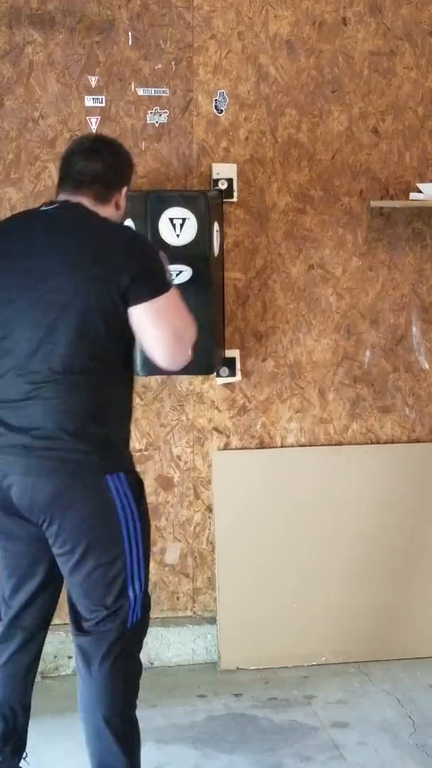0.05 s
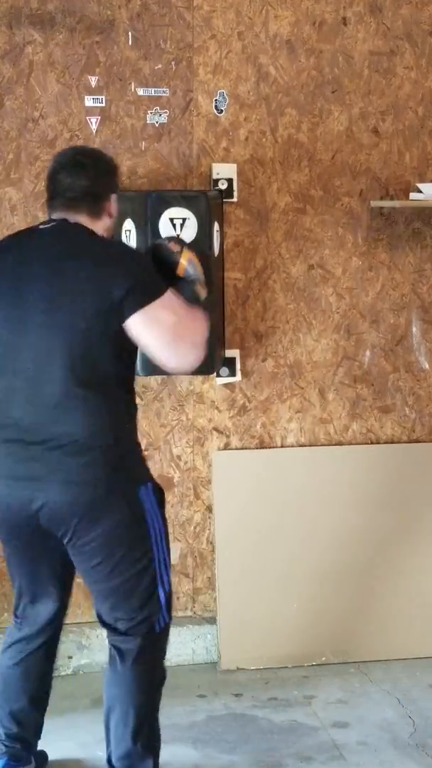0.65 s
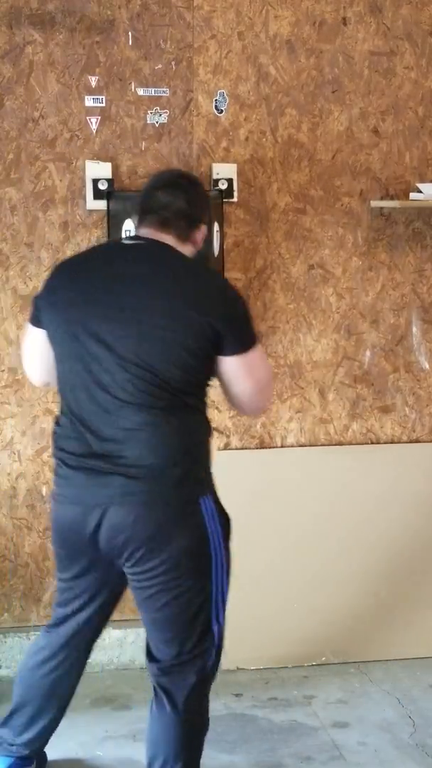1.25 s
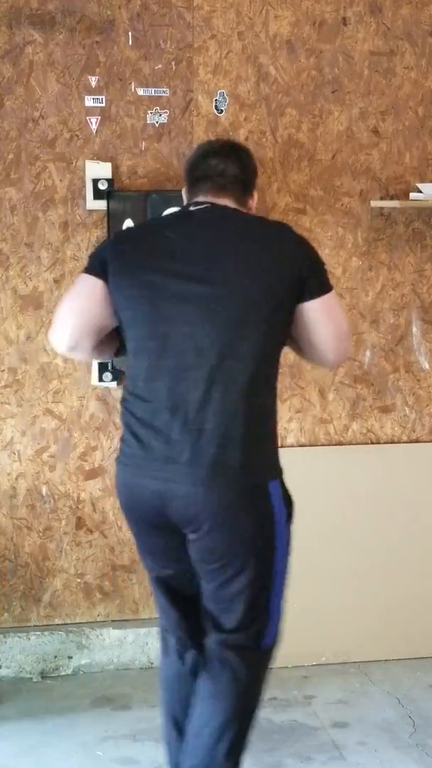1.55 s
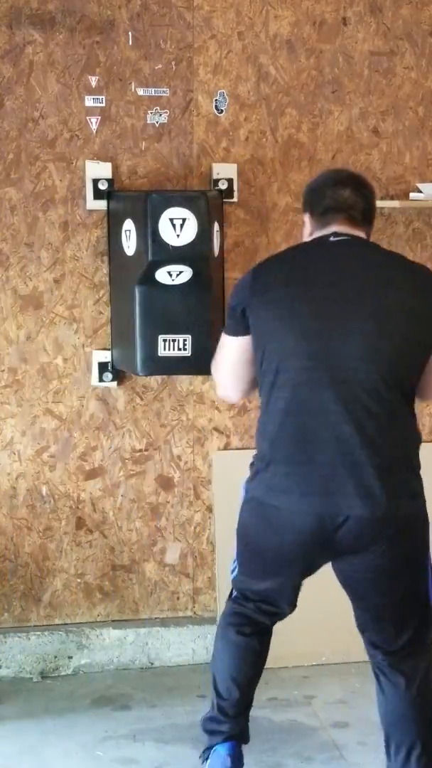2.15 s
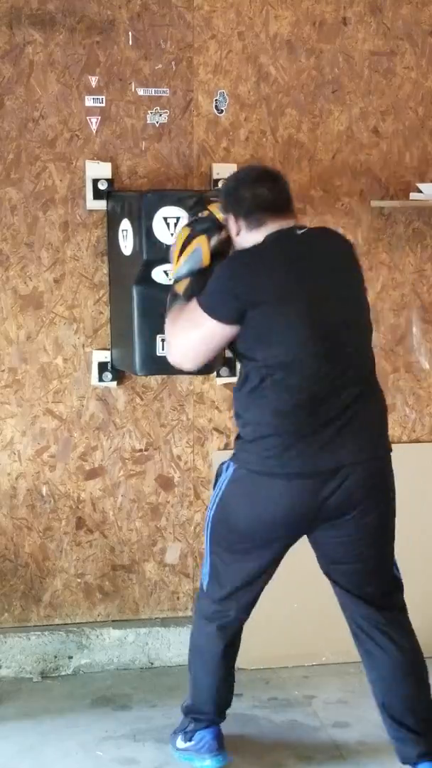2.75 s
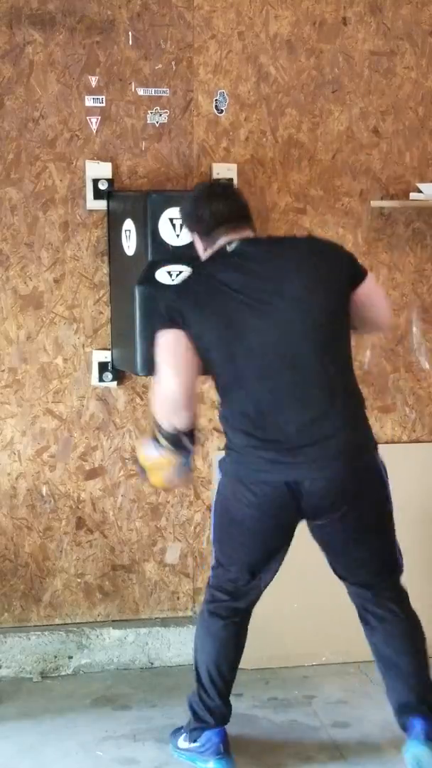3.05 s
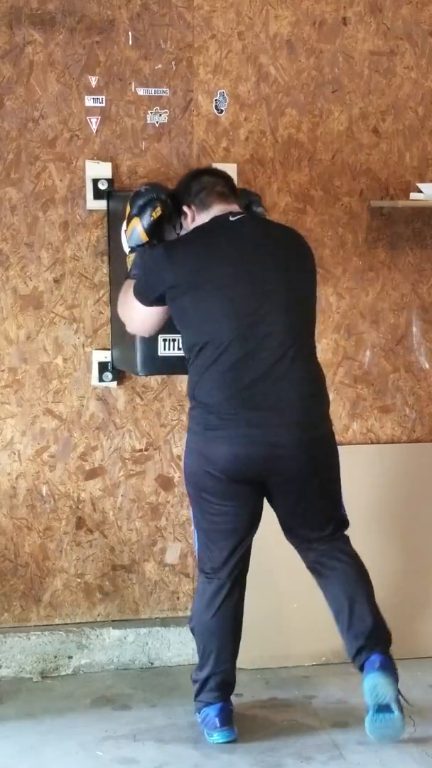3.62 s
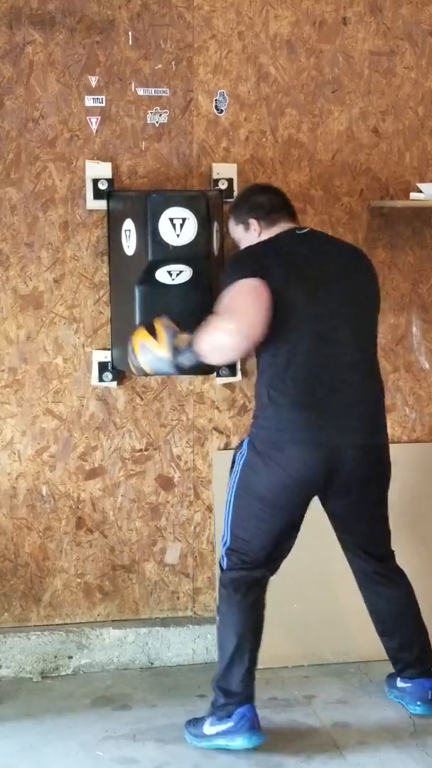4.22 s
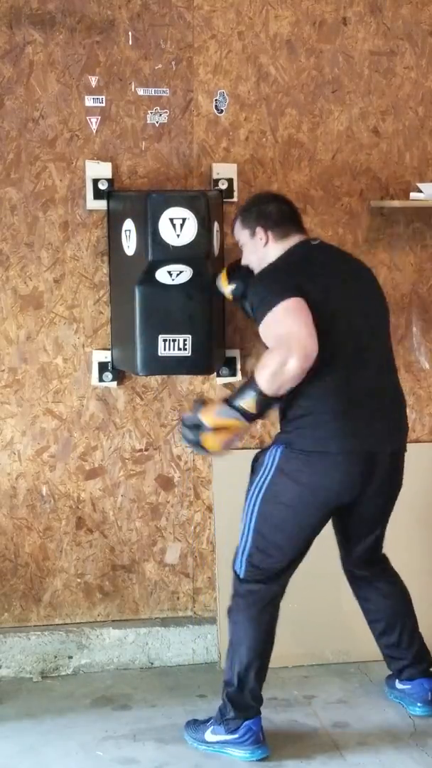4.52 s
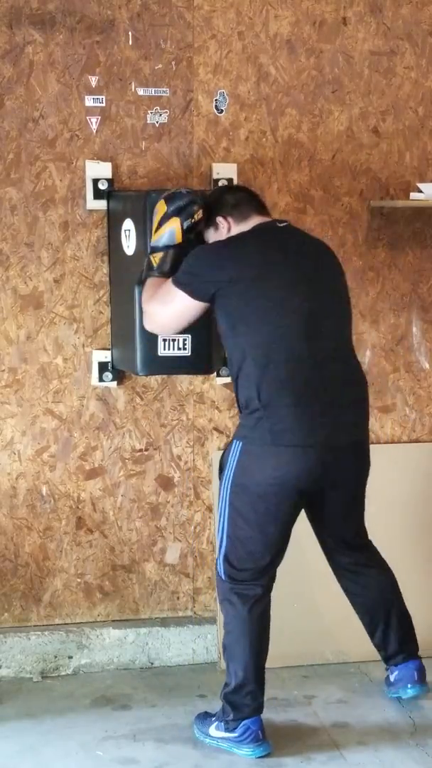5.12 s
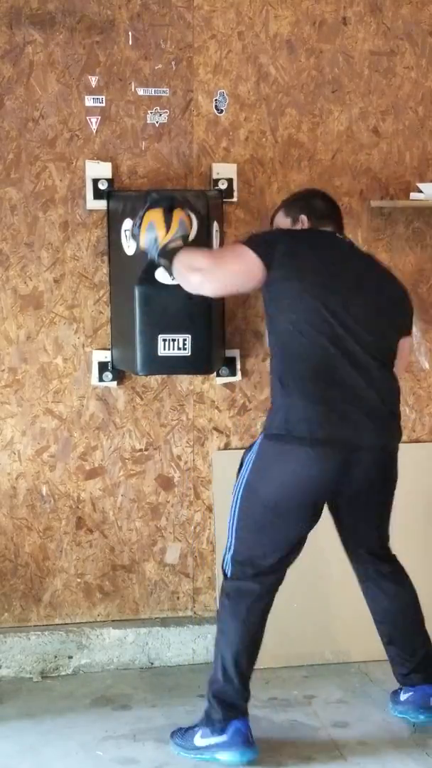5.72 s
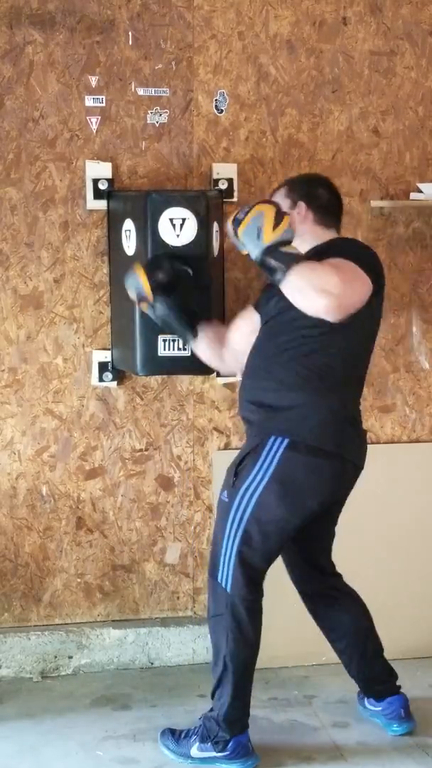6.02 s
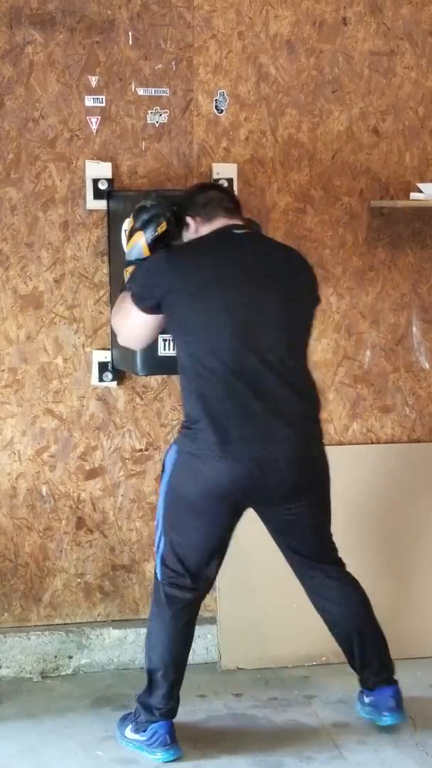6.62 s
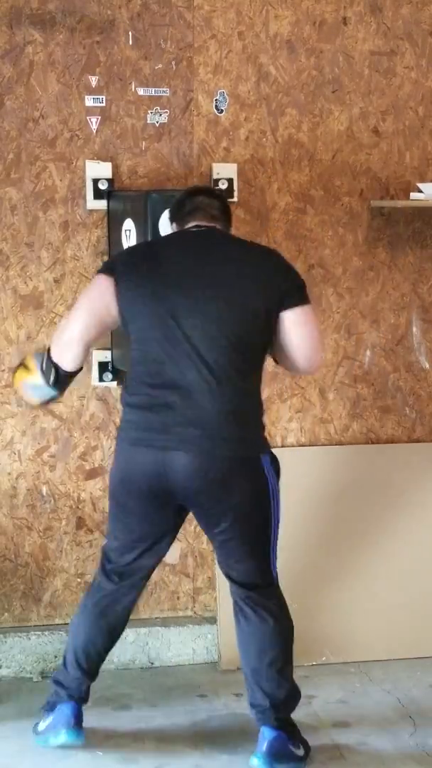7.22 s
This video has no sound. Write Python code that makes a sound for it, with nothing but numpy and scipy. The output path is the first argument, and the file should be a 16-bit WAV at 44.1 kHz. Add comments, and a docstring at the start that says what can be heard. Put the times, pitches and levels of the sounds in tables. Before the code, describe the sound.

Gloved punches slap and boom on a wall-mounted pad in short combinations, with loose metal jangling and shoes scuffing in a garage.

```python
"""A boxer shifts on the concrete of a garage, shoes scuffing, clothes swishing. From 0.5 s, ten gloved
punches land in short combinations on a padded bag bolted to the board wall. Each time a sleeve swishes,
the glove slaps the vinyl, the foam bottoms out and the wall booms; then loose metal jangles and steel
hums. After some punches the boards shudder. A washer pings near 1.1 s; a loose fixture chatters at
1.2 s and 3.6 s. More footwork leads to the last punch at 7.3 s. Faint air noise and a whine throughout."""
import sys
import numpy as np
from scipy import signal
from scipy.io import wavfile

SR = 44100
rng = np.random.default_rng(int(sys.argv[2]) if len(sys.argv) > 2 else 0)


def store_pcm(level_fs):
    """Save levels as 16-bit WAV."""
    pcm = np.round(np.clip(level_fs, -1, 1) * 32767).astype(np.int16)
    wavfile.write(sys.argv[1], SR, np.atleast_2d(pcm).T)


N = 325017
HOP = 16  # samples per envelope tick
TIME = np.arange(N) / SR
TICKS = TIME[::HOP]

# punches: start_s, slap_db, thump_db, sting_db, boom_hz, knock_hz, contact_s,
# jangle_db, hum_db, hum_hold_s, sleeve_db
PUNCH_HITS = [(0.513, -26, -33.5, -39.5, 98, 1400, 0.034, -33, -37, 0.51, -60),
              (0.816, -10.5, -18.5, -29, 380, 800, 0.022, -31.5, -32.5, 0.14, -60),
              (2.418, -15.5, -24, -31, 114.3, 1150, 0.039, -29, -31.5, 0.27, -78),
              (2.746, -15.5, -23.5, -30, 176, 1500, 0.046, -34.5, -33, 0.22, -43),
              (3.162, -7, -13.5, -18, 133, 2540, 0.035, -38, -37.5, 0.56, -50),
              (4.299, -17, -19.5, -32, 133, 780, 0.025, -32.5, -38, 0.32, -50),
              (4.681, -8.5, -12.5, -24.5, 147, 1750, 0.026, -37.5, -46, 0.51, -55),
              (5.694, -17, -25, -33, 342, 970, 0.039, -34.5, -41, 0.2, -73),
              (6, -12.5, -15.5, -25.5, 175, 885, 0.035, -33.5, -42.5, 0.33, -37.5),
              (7.312, -12, -13, -22.5, 165, 1200, 0.014, -21.5, -42, .35, -80)]
# glove on vinyl, third-octave spectrum: freq_hz, level_db
SLAP_SPECTRUM = [(24, 0), (36, -5), (55, -17), (100, -3.5), (200, -8), (400, -8.5), (700, -16.5),
                 (1100, -21), (1700, -16.5), (2600, -14.5), (3600, -10), (5500, -8.5), (7800, -5),
                 (12500, -8), (16000, -12)]
# modes of wall and bag: pitch_hz, level_db, t60_s
WALL_MODES = [(33.5, -10, 1), (93.7, -2.5, 0.21), (127.5, 9.5, 0.21), (147, 10.5, 0.28), (159.8, 6, 0.21),
              (202, -6, 0.061), (258, 0.5, 0.47), (314, 5, 0.42), (389, 7.5, 0.11)]
# loose metal resonances: pitch_hz, width_hz, level_db
METAL_MODES = [(664, 140, -12), (872, 110, 1), (1344, 52, -0.5), (1496, 120, 0.5), (1700, 57, -8),
               (2306, 86, 0), (2750, 170, -4.5), (3763, 110, -5), (4640, 270, -16)]
# humming steel modes: pitch_hz, level_db
STEEL_MODES = [(438.7, -7.5), (420.5, -10.5), (457, -10)]
# board shudders: start_s, level_db, hold_s
BOARD_SHUDDERS = [(0.89, -29.5, 0.28), (2.858, -38, 0.22), (4.406, -32, 0.17)]
# boards, third-octave spectrum: freq_hz, level_db
BOARD_SPECTRUM = [(30, -29), (55, -21), (110, -15), (280, -11), (600, -18.5), (2000, -19.5), (5000, -21.5),
                  (12000, -29.5)]
# bouts of fixture chatter: start_s, level_db, hold_s
CHATTER_BOUTS = [(1.203, -43, 0.55), (3.646, -54, 0.7)]
# fixture resonances: pitch_hz, width_hz, level_db
FIXTURE_MODES = [(4500, 670, -1), (5650, 650, 1), (7500, 640, -2)]
# footfalls and scrapes: start_s, scuff_db, heel_db, sole_hz, landing_s, contact_s
FOOTFALLS = [(.112, -52, -55, 607, .004, 0.057), (0.269, -43, -51, 1007, .2, 0.046),
             (1.965, -45, -53, 333, 0.031, 0.047), (2.02, -46, -66, 1440, .03, 0.045),
             (5.099, -54, -43.5, 153, .002, 0.015), (6.495, -48, -44, 380, 0.011, 0.029),
             (6.584, -49, -41, 174, .001, 0.013), (6.725, -60, -40.5, 310, 0.0045, 0.022),
             (6.73, -44.5, -47, 2800, .01, 0.033), (7.218, -40, -44, 1147, .0004, 0.012)]
# shoe on concrete, third-octave spectrum: freq_hz, level_db
SHOE_SPECTRUM = [(30, -16), (120, -18), (350, -7.5), (700, -13.5), (1400, -14.5), (3500, -16), (12000, -63)]
# swishes as the stance shifts: centre_s, level_db, width_s, tilt_db_per_octave
STANCE_SWISHES = [(.31, -55, 0.037, 0), (.65, -46, 0.033, 0.5), (1.669, -48.5, 0.14, -0.9),
                  (2.05, -61.5, 0.11, 2.5), (3.06, -59.5, 0.05, 5.5), (3.99, -50.5, 0.042, 1),
                  (4.18, -49, 0.07, 1.5), (5.40, -50, 0.038, 0.5), (6.492, -46.5, 0.011, 5),
                  (6.9, -54.5, 0.71, -0.5), (6.94, -45.5, 0.02, 3.5)]
# cloth, third-octave spectrum: freq_hz, level_db
CLOTH_SPECTRUM = [(100, -20.5), (500, -10), (1500, -8.5), (4000, -3), (7500, -5), (12500, -7), (16000, -10)]
# still air, third-octave spectrum: freq_hz, level_db
AIR_SPECTRUM = [(25, -83), (90, -66.5), (200, -73), (500, -67), (1400, -64.5), (4000, -65.5), (7500, -67.5),
                (12000, -71), (16000, -72)]
# garage decay: freq_hz, t60_s
GARAGE_DECAY = [(40, 0.68), (150, 0.87), (400, 0.93), (1500, 0.72), (4000, 0.69), (8000, 0.57),
                (14000, 0.37)]
# early reflections: left_delay_s, right_delay_s, level_db
EARLY_ECHOES = [(.0019, 0.0032, -33), (.0047, 0.0045, -37), (.0083, .0097, -13.5)]
# stereo balance: freq_hz, left_minus_right_db
STEREO_BALANCE = [(150, 0.3), (600, 1.5), (1200, 2), (4500, 5), (8000, 2), (14000, -0.5)]
# stereo width: freq_hz, side_minus_mid_db
STEREO_WIDTH = [(40, -27), (125, -22), (250, -12), (500, -7), (1000, -2), (2500, -2), (12000, -2.3)]
# microphone response: freq_hz, gain_db
MIC_RESPONSE = [(6500, -1), (8000, -1), (8800, -12), (10500, -7), (12500, -1.5), (15500, -3.5)]


def glove_slaps(hz, touches):
    """Band power of the gloves: air push, padding thud, slap with a hollow knock, vinyl sting."""
    power = 0
    for touch, (_, slap_db, thump_db, sting_db, _, knock_hz, *_) in zip(touches, PUNCH_HITS):
        push_db = min(thump_db - 7, -30)  # capped once the padding is flat
        thud_db = -12.2 + 0.55 * thump_db
        level_db = at_hz([(60, push_db), (300, thud_db), (1400, slap_db), (6000, sting_db)], hz)
        knock_db = 3 * bump(hz, knock_hz, octaves=0.31)
        power += touch * from_db(level_db + at_hz(SLAP_SPECTRUM, hz) + knock_db) ** 2
    return power


def wall_boom(squeeze_s=0.0092, pop_s=0.00028):
    """Air pops from under the glove; the push builds through the foam and rings the wall's modes."""
    out, age = np.zeros(N), np.arange(SR) / SR
    build = 1 - np.exp(-(age / squeeze_s) ** 2)
    pop = age / pop_s * np.exp(1 - age / pop_s) * (1 - age / pop_s / 2)
    rings = np.array([from_db(db - 60 * age / t60_s) * np.sin(2 * np.pi * hz * age)
                      for hz, db, t60_s in WALL_MODES])
    modes_hz = np.array(WALL_MODES)[:, 0]
    for start_s, slap_db, thump_db, _, boom_hz, *_ in PUNCH_HITS:
        # the landing spot favours modes near boom_hz
        shares = from_db(5 * (bump(modes_hz, boom_hz, octaves=0.3) - 1.5))
        blow = from_db(thump_db) * build * (shares @ rings) + from_db(slap_db + 6) * pop
        at = int(start_s * SR)
        out[at:at + SR] -= blow[:N - at]
    return out


def foam_bottoming(delay_s=0.017, pitch_hz=202, width_s=0.0054, soft_slap_db=-20):
    """The foam goes flat and the fist knocks on the board; soft punches barely get through."""
    out = 0
    for start_s, slap_db, thump_db, *_ in PUNCH_HITS:
        age = TICKS - start_s - delay_s
        level_db = -10 + 0.45 * thump_db + 2 * min(slap_db - soft_slap_db, 0)
        out += from_db(level_db) * np.exp(-(age / width_s) ** 2) * np.cos(2 * np.pi * pitch_hz * age)
    return to_samples(out)


def metal_jangle(clicks_per_s=1200, swell_s=0.094, fade_s=0.15, pivot_hz=1800):
    """Shaken metal rings with dense small clicks that swell after each punch and settle."""
    starts_s, _, thump_db, *_, jangle_db, _, _, _ = np.transpose(PUNCH_HITS)
    ages = np.maximum(TICKS - starts_s[:, None], 0)
    shakes = (1 - np.exp(-ages / swell_s)) * np.exp(-ages / fade_s)
    tilt_db_per_octave = 0.17 * (thump_db + 26)  # heavy thumps shake small, bright parts more
    clicks = rng.random(N) < clicks_per_s / SR
    out = 0
    for hz, width_hz, db in METAL_MODES:
        shares = from_db(jangle_db + db + tilt_db_per_octave * np.log2(hz / pivot_hz))
        ring = unit_rms(resonance(clicks * rng.standard_normal((2, N)) + 1e-18, hz, width_hz))
        out += ring * to_samples((shares @ shakes) * from_db(2 * drift(25, TICKS)))
    return out * from_db([[2], [0]])  # louder on the left


def steel_hum(rough_db=-4, rough_hz=440, rough_width_hz=110, attack_s=0.18, release_s=0.13):
    """Close modes of shaken steel beat after each punch, roughened by knocking in its bracket."""
    tones = 0
    for hz, db in STEEL_MODES:
        phase = 2 * np.pi * hz * TIME + drift(14, TIME)
        stereo_phase = 0.25 * np.array([drift(6, TIME), drift(6, TIME)])
        tones += from_db(db) * np.sin(phase + stereo_phase)
    knocking = resonance(rng.standard_normal(N), rough_hz, rough_width_hz)
    knocking = resonance(knocking, rough_hz, rough_width_hz)
    hum = unit_rms(tones) + from_db(rough_db) * unit_rms(knocking)
    power = sum((from_db(hum_db) * envelope(TICKS - start_s, attack_s, hold_s, release_s)) ** 2
                for start_s, *_, hum_db, hold_s, _ in PUNCH_HITS)
    return unit_rms(hum) * to_samples(np.sqrt(power))


def board_shudder(lump_db=5, lumps_per_s=69, linger_s=0.087):
    """Power of the boards knocking unevenly against their studs."""
    shaking = sum(from_db(db) * envelope(TICKS - start_s, 0.018, hold_s, release_s=0.16)
                  for start_s, db, hold_s in BOARD_SHUDDERS)
    lumps = from_db(lump_db * drift(lumps_per_s, TICKS))
    return HOP / SR / linger_s * (shaking * lumps) ** 2


def fixture_chatter(swings_per_s=25):
    """A loose fixture rocks as the wall settles, buzzing against its seat once a swing."""
    swings = swings_per_s * TICKS + 0.03 * drift(8, TICKS)
    seating = np.abs(np.cos(np.pi * swings)) ** 3
    rocking = sum(from_db(db) * envelope(TICKS - start_s, 0.024, hold_s, release_s=0.05)
                  for start_s, db, hold_s in CHATTER_BOUTS)
    grit = rng.standard_normal((2, N))
    buzz = sum(from_db(db) * unit_rms(resonance(grit, hz, width_hz)) for hz, width_hz, db in FIXTURE_MODES)
    return unit_rms(buzz) * to_samples(rocking * seating)


def washer_ping(start_s=1.06, pitch_hz=7700, level_db=-48):
    """A small washer rings once, thin and high, kept alive by tiny knocks."""
    ring = unit_rms(resonance(rng.standard_normal((2, N)), pitch_hz, width_hz=60))
    return ring * from_db(level_db) * envelope(TIME - start_s, attack_s=0.02, hold_s=0.042, release_s=0.1)


def footfalls(hz, treads):
    """Band power of the shoes: a dull heel and a gritty, resonant sole."""
    power = 0
    for tread, (_, scuff_db, heel_db, sole_hz, *_) in zip(treads, FOOTFALLS):
        level_db = at_hz([(220, heel_db), (900, scuff_db)], hz)
        sole_db = 7 * bump(hz, sole_hz, octaves=0.53)
        power += tread * from_db(level_db + at_hz(SHOE_SPECTRUM, hz) + sole_db) ** 2
    return power


def cloth_strokes(lead_s=0.012, sleeve_width_s=0.031, sleeve_db_per_octave=0.8, linger_s=0.1):
    """Power and tilt of each swish: a sleeve just before each punch, and the shifts of stance."""
    sleeves = [(start_s - lead_s, db, sleeve_width_s, sleeve_db_per_octave)
               for start_s, *_, db in PUNCH_HITS]
    folds = HOP / SR / linger_s * from_db(7 * drift(150, TICKS))  # cloth catches and slips
    return [(from_db(db) ** 2 * folds * np.exp(-((TICKS - centre_s) / width_s) ** 2), tilt)
            for centre_s, db, width_s, tilt in sleeves + STANCE_SWISHES]


def cloth_swishes(hz, strokes, pivot_hz=4000):
    """Band power of rubbing cloth, each stroke with its own tilt."""
    octaves = np.log2(max(hz, 500) / pivot_hz)
    return sum(power * from_db(tilt * octaves + at_hz(CLOTH_SPECTRUM, hz)) ** 2 for power, tilt in strokes)


def garage_noise(landing_s=0.0052, crinkle_db=2):
    """Gloves, shoes, cloth and boards fill the garage by third-octaves, over still air."""
    touches = [contact(start_s, contact_s, landing_s)
               * from_db(crinkle_db * drift(457, np.abs(TICKS - start_s)))
               for start_s, _, _, _, _, _, contact_s, *_ in PUNCH_HITS]
    treads = [contact(start_s, contact_s, rise_s) for start_s, *_, rise_s, contact_s in FOOTFALLS]
    strokes, boards = cloth_strokes(), board_shudder()
    white, out = rng.standard_normal((2, 2, N)), 0
    for band, hz in enumerate(25 * 2 ** (np.arange(29) / 3)):
        power = glove_slaps(hz, touches) + footfalls(hz, treads) + cloth_swishes(hz, strokes)
        power += boards * from_db(at_hz(BOARD_SPECTRUM, hz)) ** 2
        heard = garage_reverb(power, hz) + from_db(at_hz(AIR_SPECTRUM, hz)) ** 2
        out += stereo_band(white[band % 2], hz) * to_samples(np.sqrt(heard))
    return out


def garage_reverb(power, hz, direct_s=0.024):
    """Direct power plus a room tail that dies at the band's own rate."""
    feedback = from_db(-60 * HOP / SR / at_hz(GARAGE_DECAY, hz)) ** 2
    return power * direct_s * SR / HOP + signal.lfilter([1], [1, -feedback], power + 1e-18)


def early_reflections(x, above_hz=600):
    """Nearby boards and the floor return mids and treble within milliseconds."""
    bright = signal.sosfilt(signal.butter(2, above_hz, "high", fs=SR, output="sos"), x)
    for *delays_s, db in EARLY_ECHOES:
        echo = [np.interp(TIME - lag_s, TIME, side, left=0) for lag_s, side in zip(delays_s, bright)]
        x = x + from_db(db) * np.array(echo)
    return x


def electrical_whine(pitch_hz=13450, level_db=-74):
    """A faint high tone with jittering phase."""
    return from_db(level_db) * np.sqrt(2) * np.sin(2 * np.pi * pitch_hz * TIME + 3 * drift(150, TIME))


def stereo_band(white, hz):
    """A third-octave of diffuse noise: channels alike in the bass, apart in the treble."""
    edges_hz = hz * 2 ** (np.array([-1, 1]) / 6)
    mid_side = signal.sosfilt(signal.butter(2, edges_hz, "band", fs=SR, output="sos"), white)
    side, lean_db = from_db(at_hz(STEREO_WIDTH, hz)), at_hz(STEREO_BALANCE, hz) / 2
    to_left_right = from_db([[lean_db], [-lean_db]]) * np.array([[1, side], [1, -side]])
    return to_left_right @ mid_side / mid_side.std()


def contact(start_s, length_s, landing_s):
    """Power of a soft contact, unit sum: grows as the surfaces meet, gone once they lie flat."""
    age = np.maximum(TICKS - start_s, 0)
    power = (1 - np.exp(-age / landing_s)) * np.exp(-(age / length_s) ** 2)
    return power / (power.sum() + 1e-12)


def envelope(age_s, attack_s, hold_s, release_s):
    """Gain that builds from age 0 and decays after hold_s."""
    age_s = np.maximum(age_s, 0)
    return (1 - np.exp(-(age_s / attack_s) ** 2)) * np.exp(-np.maximum(age_s - hold_s, 0) / release_s)


def resonance(x, hz, width_hz):
    """Two-pole resonance."""
    radius = np.exp(-np.pi * width_hz / SR)
    return signal.lfilter([1, 0, -1], [1, -2 * radius * np.cos(2 * np.pi * hz / SR), radius ** 2], x)


def drift(rate_hz, times_s):
    """Random wander, spread about 1."""
    knots = rng.standard_normal(1024)
    return np.interp(times_s * rate_hz, np.arange(len(knots)), knots)


def bump(hz, centre_hz, octaves):
    """Bell on the pitch axis, peak 1."""
    return np.exp(-(np.log2(hz / centre_hz) / octaves) ** 2)


def at_hz(points, hz):
    """Table lookup on a log-frequency axis."""
    freqs_hz, values = np.transpose(points)
    return np.interp(np.log(hz), np.log(freqs_hz), values)


def to_samples(per_tick):
    """Tick rate to sample rate."""
    return np.interp(TIME, TICKS, per_tick)


def from_db(db):
    """Decibels to gain."""
    return 10 ** (np.asarray(db) / 20)


def unit_rms(x):
    """Scale to rms 1."""
    return x / np.sqrt(np.mean(x ** 2) + 1e-20)


def scene():
    """The workout, the shaken metal and the whine, in stereo."""
    whine = electrical_whine()
    workout = early_reflections(garage_noise()) + wall_boom() + foam_bottoming()
    metal = steel_hum() + metal_jangle() + washer_ping() + fixture_chatter()
    return workout + metal + whine


def record(dry, fade_from_db=-3.5, fade_s=0.38, cutoff_hz=16000):
    """Microphone dulls the upper treble; short fade-up, rounded peaks, low-pass."""
    grid_hz = np.linspace(0, SR / 2, 257)
    taps = signal.firwin2(127, grid_hz, from_db(at_hz(MIC_RESPONSE, grid_hz + 1)), fs=SR)
    heard = signal.oaconvolve(dry, taps[None], mode="same", axes=1)
    heard *= from_db(np.interp(TIME, [0, fade_s], [fade_from_db, 0]))
    rounded = heard / (1 + heard ** 4) ** (1 / 4)
    return signal.sosfilt(signal.ellip(10, 0.1, 70, cutoff_hz, fs=SR, output="sos"), rounded)


dry = scene()
out = record(dry)
store_pcm(out)
```